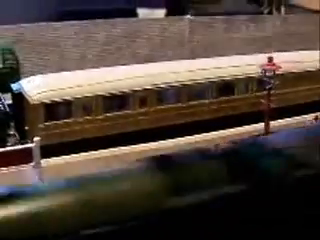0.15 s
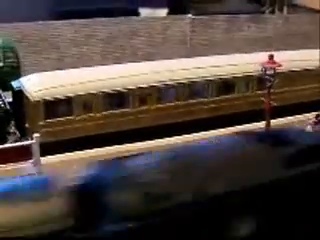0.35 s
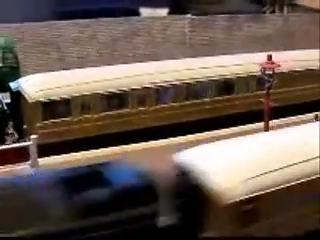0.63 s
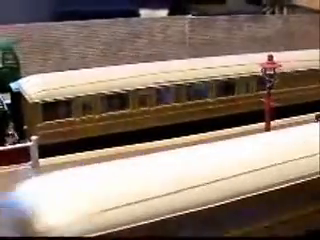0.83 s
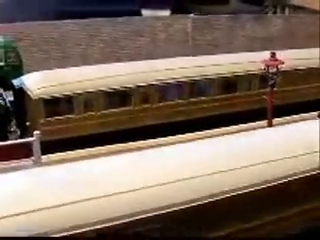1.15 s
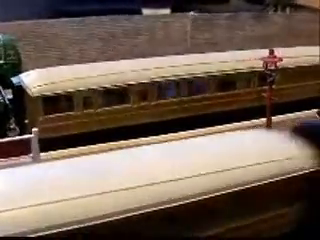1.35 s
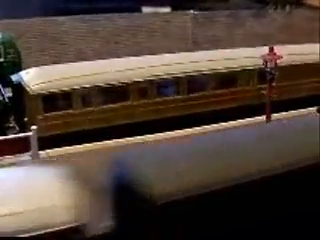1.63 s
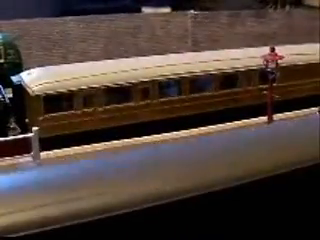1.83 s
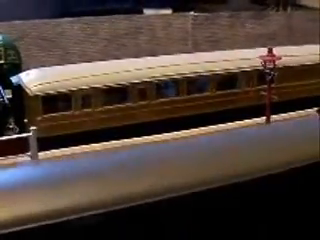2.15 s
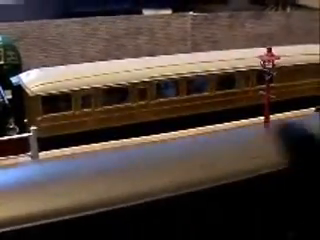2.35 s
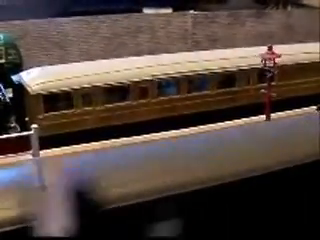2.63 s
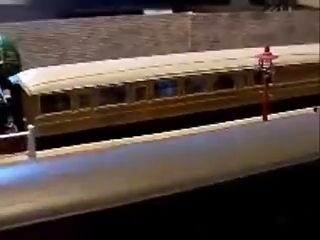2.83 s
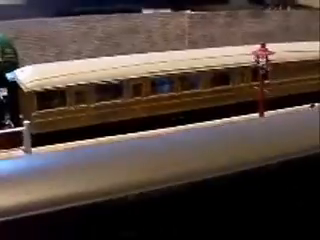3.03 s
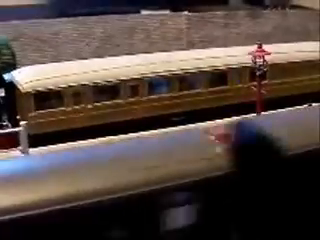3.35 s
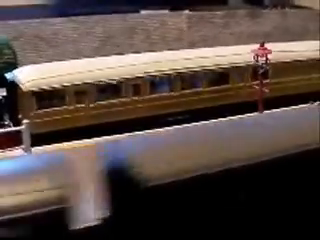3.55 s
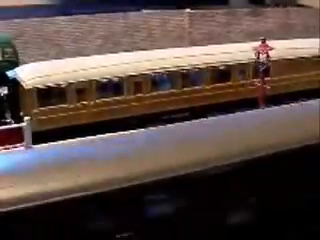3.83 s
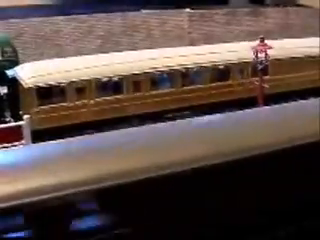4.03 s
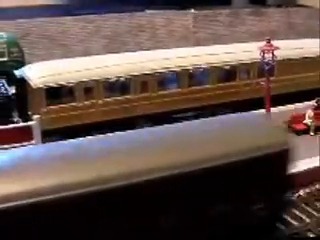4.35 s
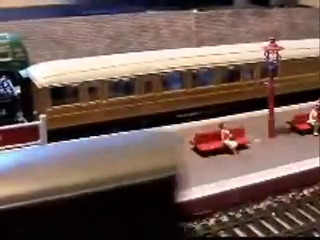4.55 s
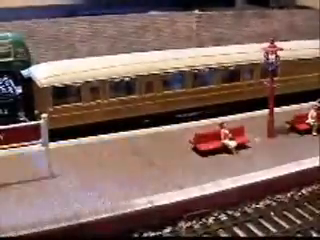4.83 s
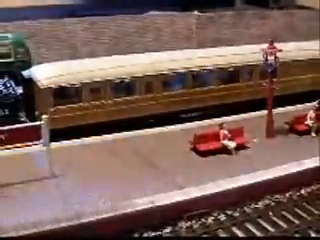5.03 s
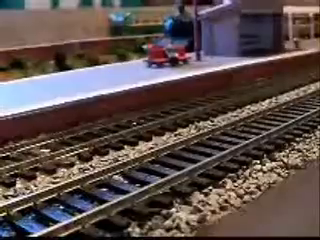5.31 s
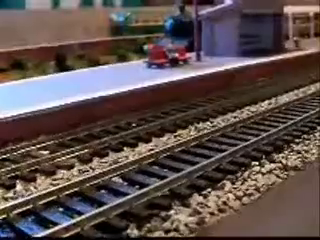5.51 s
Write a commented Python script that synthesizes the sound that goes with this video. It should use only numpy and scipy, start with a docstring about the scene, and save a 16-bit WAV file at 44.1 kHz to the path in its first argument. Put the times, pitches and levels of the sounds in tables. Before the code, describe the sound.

An electric model train is already rolling past close to the microphone at the start, nearly central. Its small metal wheels make a continuous, gritty roar with a hiss on top. Sharp little double clicks come unevenly as the axles cross a rail joint, thickest between about 0.4 and 0.9 seconds, then several a second. Beneath them the wooden baseboard gives a wavering hollow boom and soft low thuds, clearest near the start and around 2.5 seconds. A faint, thin, high motor whine comes in spurts, weakens after 1.5 seconds and is gone by 3 seconds. The roar holds steady until about 4 seconds, then drops as the train draws away and the clicks grow sparser. At about 5.2 seconds the sound switches to another spot on the layout, where the rolling is louder again and slightly brighter, with a few more clicks until the end at about 5.7 seconds.

```python
"""A roar of small metal wheels on rails, close to the microphone: an electric model train is rolling past.
Its axles click over a rail joint, the wooden baseboard booms and thuds beneath them, and the motor
at the front whines faintly. The train draws away; for the last half second it is heard from
another spot on the layout."""
import sys
import numpy as np
from scipy import signal
from scipy.fft import rfft, irfft, next_fast_len
from scipy.io import wavfile

SR = 44100
rng = np.random.default_rng(int(sys.argv[2]) if len(sys.argv) > 2 else 0)


def transcribe(u):
    """Save the signal u as a 16-bit wav file named by the first command-line argument.

    u: samples, shape (n,) or (channels, n), limited to [-1, 1]; the rate is SR.
    q: integer samples, one column per channel.
    """
    v = np.clip(np.atleast_2d(u).T, -1, 1)
    q = np.round(v * 32767).astype(np.int16)
    wavfile.write(sys.argv[1], SR, q)


N = 250488


def from_db(db):
    return 10 ** (np.asarray(db) / 20)


def unit_rms(x):
    return x / np.sqrt(np.mean(x ** 2) + 1e-20)


def in_time(rows):
    """One curve for each column after time_s, one value a sample."""
    times, *columns = np.transpose(rows)
    return [np.interp(np.arange(N) / SR, times, column) for column in columns]


def at_hz(points, hz):
    """A spectrum read on a log-frequency axis."""
    points_hz, levels_db = np.transpose(points)
    return np.interp(np.log(hz), np.log(points_hz), levels_db)


def drift(per_s):
    """A slow random wander of RMS 1, changing about per_s times a second."""
    hop, settle = 40, 2000
    pole = np.exp(-2 * np.pi * hop * per_s / SR)
    noise = rng.standard_normal(N // hop + settle + 2)
    slow = signal.lfilter([1], [1, -2 * pole, pole * pole], noise)[settle:]
    return np.interp(np.arange(N) / hop, np.arange(len(slow)), unit_rms(slow))


def ring(x, hz, t60_s):
    """A resonance that passes no deep bass; a unit click sets it ringing at about height 1."""
    radius, angle = from_db(-60 / (t60_s * SR)), 2 * np.pi * hz / SR
    return signal.lfilter([.5, 0, -.5], [1, -2 * radius * np.cos(angle), radius * radius], x + 1e-18)


def soft_ring(x, hz, t60_s):
    """Two resonances in series, so the ringing swells before it dies."""
    return ring(ring(x, hz, t60_s / 2), hz, t60_s)


def rail_grit(per_s, spread_db):
    """Roughness of wheel and rail: dense tiny bumps of uneven size."""
    sizes = from_db(spread_db * np.minimum(rng.exponential(1, N), 3)) * rng.choice([-1, 1], N)
    return unit_rms(sizes * (rng.random(N) < per_s / SR))


# The motor, fading as it leaves the microphone: time_s, lower_tone_db, upper_tone_db
WHINE_LEVELS = [(0, -47, -34.5), (.15, -40, -37), (.5, -40, -43), (.65, -43, -47.5), (.95, -40.5, -41),
                (1.1, -32, -45), (1.17, -47, -48.5), (1.4, -47, -40.5), (1.6, -57, -61), (1.9, -54, -56),
                (2.2, -62, -65), (2.8, -57, -61), (3, -70, -88)]


def motor_whine(pitches_hz=(4878, 7405), width_hz=24, rough_db=-1, spurt_db=2.5):
    """The motor's two thin tones swell in spurts, each roughened by a narrow band of noise."""
    out, t60_s = 0, np.log(1000) / (np.pi * width_hz)
    for level_db, hz in zip(in_time(WHINE_LEVELS), pitches_hz):
        rough = unit_rms(soft_ring(rng.standard_normal(N), hz, t60_s))
        tone = np.sqrt(2) * np.sin(2 * np.pi * hz * np.arange(N) / SR) + from_db(rough_db) * rough
        spurts = from_db(spurt_db * drift(per_s=6))
        out = out + from_db(level_db) * unit_rms(spurts * tone)
    return out


# Thuds in the wood under the track: start_s, peak_db, pitch_hz
BOARD_THUDS = [(.088, -43.5, 125), (.428, -54, 150), (.6, -63, 90), (0.656, -48, 150), (.755, -52.5, 115),
               (1.099, -56, 120), (1.2, -55, 120), (1.38, -59, 140), (1.52, -59, 140), (1.68, -56, 145),
               (1.749, -53, 149), (1.885, -60, 75), (2.14, -59, 135), (2.363, -49, 125), (2.466, -45, 130),
               (2.558, -53, 90), (2.672, -47, 105), (2.745, -54, 110), (3.154, -53.5, 110),
               (3.475, -56, 100), (3.612, -55, 90), (3.96, -60, 70), (4.608, -60, 100), (4.76, -52, 110),
               (5.394, -53, 100), (5.621, -55, 130)]


def board_thuds(t60_cycles=9):
    """The baseboard thuds under the heavier axles, swelling softly and dying within a few cycles."""
    out, click = np.zeros(N + SR), signal.unit_impulse(SR // 4)
    for start_s, peak_db, hz in BOARD_THUDS:
        thud = soft_ring(click, hz, t60_cycles / hz)
        start = round(start_s * SR)
        out[start:start + len(thud)] += from_db(peak_db) * thud / np.abs(thud).max()
    return out[:N]


# The baseboard's boom, swelling and sinking as the wheels move over it: time_s, level_db
BOOM_LEVELS = [(0, -36), (.35, -56), (.45, -40), (.54, -29.5), (.72, -41.5), (.85, -35.5), (1.1, -44.5),
               (1.25, -31), (1.4, -61), (1.6, -37), (1.9, -35), (2.15, -38), (2.4, -40), (2.95, -37),
               (3.2, -35), (3.5, -43), (3.77, -32), (3.9, -52.5), (4.5, -37), (4.9, -41), (5.2, -41),
               (5.68, -40)]


def board_boom(pitch_hz=915, width_hz=80):
    """Rail grit drives one resonance of the baseboard."""
    t60_s = np.log(1000) / (np.pi * width_hz)
    boom = soft_ring(rail_grit(per_s=4000, spread_db=0.88), pitch_hz, t60_s)
    return from_db(in_time(BOOM_LEVELS)[0]) * unit_rms(boom)


# How near the train is to the microphone, as a gain: time_s, nearness_db
NEARNESS = [(0, 0), (.35, 2), (.75, 0.5), (1.1, 0), (1.7, 0.5), (2.15, -0.5), (2.6, 0.5), (3.2, 0),
            (3.6, -2), (3.92, -1), (4.25, -5.5), (4.6, -5.5), (5.05, -8.5), (5.22, -8.5)]
# Rise and fall of the rumble at the first spot: time_s, gain_db
RUMBLE_SWELL = [(0, 3.5), (.45, -1), (.75, -5), (1.1, -5.5), (1.6, -2.5), (2.2, -3.5), (2.5, 3), (3.4, 1),
                (3.7, -3), (5.2, 4.5)]
# Rumble, roar, rush, hiss and top hiss at the microphone, a row each:
# near_db, nearness_share, opening_db (lift or dip at the start), second_spot_db
BAND_LEVELS = [(-51.5, 0.55, 5.5, -49), (-30, 0.6, -1.8, -30), (-27.5, 0.92, 1, -29),
               (-30.5, 1.07, -3, -31.5), (-71.5, 1.94, 17, -49.5)]


def levels_at_microphone(opening_s=1.57, second_spot_s=5.222, switch_s=0.018):
    """Band levels in dB follow the train's distance as the opening lift or dip fades, then change spot."""
    t = np.arange(N) / SR
    near_db, share, opening_db, second_spot_db = np.transpose(BAND_LEVELS)[:, :, None]
    opening_fade = np.clip(1 - t / opening_s, 0, 1)
    passing_db = near_db + share * in_time(NEARNESS)[0] + opening_db * opening_fade
    passing_db[0] += in_time(RUMBLE_SWELL)[0]
    moved = np.clip((t - second_spot_s) / switch_s, 0, 1)
    return (1 - moved) * passing_db + moved * second_spot_db


# Colour of the rolling noise before each band is levelled, with a separate thin hiss near 8.5 kHz:
# frequency_hz, density_db
ROLL_SPECTRUM = [(60, -63.5), (100, -56), (160, -22), (230, -16.5), (330, -6), (550, 0.5), (780, 0),
                 (1100, -2), (2950, -7.5), (3550, -10.5), (5970, -11.5), (7060, -17), (7600, -48),
                 (8000, -34.5), (8550, -16)]
# Baseboard resonances that colour the roar: pitch_hz, width_hz, lift_db
BOARD_MODES = [(622, 50, 4), (915, 70, 2.5), (1452, 70, 1.5)]
# Faint, flickering left-right difference: frequency_hz, side_against_mid_db
SIDE_SPECTRUM = [(100, -11), (300, -49.5), (900, -20.5), (1600, -32), (2000, -18.5), (2900, -10),
                 (3900, -9), (4300, -45), (8000, -28)]
# Edges of rumble, roar, rush, hiss and top hiss: low_hz, high_hz
BAND_EDGES = [(100, 300), (300, 1500), (1500, 4000), (4000, 7200), (7600, 8600)]


def rolling_roar(levels_db, grit_db=-6, treble_flicker_db=1, flicker_db=1.17, lumps_db=3.5,
                 side_flicker_db=6):
    """Wheels on rough rails: noise and grit in flickering half-octave bands, the rumble in lumps."""
    size = next_fast_len(N)
    hz = np.maximum(np.arange(size // 2 + 1) * SR / size, 1)
    contact = rng.standard_normal(N) + from_db(grit_db) * rail_grit(per_s=2500, spread_db=2.4)
    roll_db = at_hz(ROLL_SPECTRUM, hz)
    board_db = sum(db / (1 + (2 * (hz - pitch) / width) ** 2) for pitch, width, db in BOARD_MODES)
    mid = rfft(contact, size) * from_db(roll_db + board_db)
    side = rfft(rng.standard_normal(N), size) * from_db(roll_db + at_hz(SIDE_SPECTRUM, hz))
    power = [2 * np.sum(np.abs(mid[(hz > low) & (hz < high)]) ** 2) / size ** 2
             for low, high in BAND_EDGES]
    band_gains_db = levels_db - 10 * np.log10(power)[:, None]
    log_middles = np.log(BAND_EDGES).mean(axis=1)
    out, treble_drift = 0, drift(per_s=34.4)
    for centre_hz in 62.5 * 2 ** np.arange(0, 8, .5):
        mask = np.cos(np.pi * np.clip(np.log2(hz / centre_hz), -.5, .5)) ** 2
        # how much this half octave belongs to each of the five broad bands
        shares = [np.interp(np.log(centre_hz), log_middles, band) for band in np.eye(len(BAND_EDGES))]
        rumble, _, rush, hiss, _ = shares
        together_db = treble_flicker_db * (rush + hiss) * treble_drift
        own_db = (flicker_db + lumps_db * rumble) * drift(per_s=9.4)
        gain = from_db(shares @ band_gains_db + together_db + own_db)
        side_band = from_db(side_flicker_db * drift(per_s=6.9)) * irfft(side * mask, size)[:N]
        out = out + gain * (irfft(mid * mask, size)[:N] + side_band * [[1], [-1]])
    return out


def light_knocks(count=60, per_s=3.9, base_db=-31):
    """Light knocks at random moments, fainter with distance, as rows like those of AXLE_CLICKS."""
    draws = rng.random((count, 2))
    times = 0.0082 + np.cumsum(-np.log(draws[:, 0]) / per_s)
    levels_db = base_db + np.interp(times, *np.transpose(NEARNESS)) + 2.4 * draws[:, 1]
    rings = (1898, 2813.5, 0.5, 9.5, -5.5)   # as wheel_knock takes them
    return [(time_s, db, db - 8, *rings) for time_s, db in zip(times, levels_db) if time_s < N / SR]


# Modes of a metal wheel: pitch_hz, relative_db, t60_s
WHEEL_MODES = [(549, -13, 0.012), (938, -9, 0.01), (1400, -4, 0.004), (1900, -3, 0.003), (2500, -2, 0.003),
               (3400, -2, 0.004), (4150, -5, 0.006), (5100, -11.5, 0.003), (6100, -13, 0.003)]


def wheel_knock(length, low_hz, high_hz, low_db, t60_ms, modes_db):
    """One touch of wheel on rail rings two pitches of its axle and the modes of the wheel."""
    click = signal.unit_impulse(length)
    knock = ring(click, high_hz, t60_ms / 1000) - from_db(low_db) * ring(click, low_hz, t60_ms / 1000)
    strengths = from_db(rng.normal(0, 2, len(WHEEL_MODES))) * (-1) ** np.arange(len(WHEEL_MODES))
    for strength, (hz, db, t60_s) in zip(strengths, WHEEL_MODES):
        knock += strength * from_db(db + modes_db) * ring(click, hz, t60_s)
    return knock


# Axles crossing the rail joint, as they reach the microphone: time_s, first_wheel_db, second_wheel_db,
# low_ring_hz, high_ring_hz, low_against_high_db, ring_t60_ms, wheel_modes_db
AXLE_CLICKS = [(0.089, -19, -8.5, 1410, 3510, -23, 8.3, -1.5), (0.1235, -13, -27, 1960, 3260, 4, 6.2, -3),
               (0.396, -11, -28, 2290, 2850, -4, 6.2, -1), (0.4292, -13, -5, 1210, 2280, 5, 3.1, 3.5),
               (0.442, -14, -17, 1500, 2280, -2, 6, 1), (0.521, -33, -16, 860, 2010, 15, 35, -4),
               (0.5583, -14, -15, 2020, 2450, 6, 9.1, 5), (0.5888, -5.5, -25, 1010, 2960, -6, 6.9, -4),
               (0.6055, -12, -23, 1920, 3020, 6, 8, 0), (0.6634, -6.5, -5.5, 1540, 3840, -1, 5.8, -24),
               (0.706, -7.5, -19, 2300, 2640, 3, 3.7, -1), (0.7435, -5.5, -27, 1460, 3140, -0.5, 24, -2),
               (0.8185, -15, -5.5, 970, 2170, -13, 8.7, -0.5), (0.8295, -7.5, -16, 1860, 2800, 3, 6, 12),
               (0.8666, -15, -13.5, 2000, 2690, -1, 5.5, -2),
               (1.0086, -10.5, -7.5, 1090, 2994, -10, 11, 4.5),
               (1.1351, -23, -7, 2310, 2800, -7.5, 4.8, 10), (1.3937, -9, -15, 1530, 2850, -7, 4.7, -1),
               (1.5148, -5.5, -16, 2170, 2980, -33, 3.1, -12),
               (1.6028, -6.5, -8.5, 1850, 2980, -8, 3.2, -0.5), (1.6996, -13, -12, 2085, 2830, -6, 2.7, 5),
               (1.723, -21, -5, 2200, 2620, -6, 4.3, -1), (1.847, -16, -28, 930, 2750, 4, 4, 3),
               (1.9048, -6, -12, 1310, 2980, -8, 4.8, 1), (2.0234, -16, -8.5, 1150, 3610, -11, 6.2, 1.5),
               (2.3625, -8, -15, 1320, 2770, 7, 4.1, 7), (2.543, -16, -12.5, 900, 2590, -6.5, 9.3, -1),
               (2.5637, -9.5, -10, 2000, 3260, -7, 6.6, -5.5), (2.659, -12, -20, 904, 2360, -2, 5.4, -2),
               (2.6799, -15, -5, 2150, 2610, 2, 5.5, 1), (2.8564, -15, -5, 1400, 3000, -0.5, 5.6, -3),
               (2.9705, -7.5, -19, 900, 2580, -4, 8.5, 9), (3.257, -17, -23, 1650, 2650, 12, 9.6, -13),
               (3.3285, -15, -15, 1200, 2900, 11, 9.8, -13), (3.418, -9.5, -10.5, 980, 3040, -8, 6.8, 4),
               (3.508, -6, -8, 1800, 2360, -3, 4.3, 4), (3.6326, -11, -8.5, 1900, 3740, -6, 10.5, -0.5),
               (3.8293, -24, -5.5, 1500, 2980, 0, 10, 2), (3.961, -8.5, -17, 1450, 2780, -17, 3.5, -3),
               (4.242, -29, -18, 1960, 2700, 2, 9, -9), (4.6141, -5, -7, 1470, 2370, 1, 5.4, 0.5),
               (4.766, -8, -19, 2700, 3460, -4, 7.1, -6.5), (4.7863, -19, -25, 1770, 2750, 3, 5.5, 4.5),
               (5.285, -29, -20, 1860, 4580, -8.5, 6.1, -7), (5.385, -12.5, -11, 1440, 4500, 4, 13, -16),
               (5.4285, -21, -20, 1900, 2700, -2, 6.4, -3), (5.473, -23, -17, 930, 4430, -12, 5.5, -4)]


def joint_clicks(lag_ms=1.7, lag_spread_ms=0.15, rattle_db=-14, rattle_ms=2.8, touches_per_s=2500):
    """Both wheels of an axle drop across the gap, a moment apart, amid a short rattle."""
    out, length, first = np.zeros(N), 2600, 150   # length and first touch in samples
    # light, rounded flanges: no sharp edge, no thump
    soften = np.vstack([signal.butter(8, 6300, fs=SR, output="sos"),
                        signal.butter(2, 200, "high", fs=SR, output="sos")])
    for time_s, first_db, second_db, *rings in AXLE_CLICKS + light_knocks():
        second = first + round((lag_ms + lag_spread_ms * rng.uniform(-0.66, 1)) * SR / 1000)
        rattle = rng.standard_normal(length) * (rng.random(length) < touches_per_s / SR)
        fade = np.exp(-np.abs(np.arange(length) - second) / (rattle_ms * SR / 1000))
        touches = from_db(max(first_db, second_db) + rattle_db) * rattle * fade
        touches[[first, second]] = from_db([first_db, second_db])
        knock = signal.sosfilt(soften, wheel_knock(length, *rings))
        clatter = signal.fftconvolve(touches, knock / np.abs(knock).max())[:length]
        start = round(time_s * SR) - first - np.abs(knock).argmax()   # first wheel peaks at time_s
        out[start:start + length] += clatter[:N - start]
    return out


def scene():
    """The train from beside the track, nearly central."""
    roar = rolling_roar(levels_at_microphone())
    whine = motor_whine()
    clicks = joint_clicks()
    return roar + board_boom() + board_thuds() + clicks + whine


def record(dry):
    """The small microphone loses the deep bass; the top is cut steeply."""
    thin = signal.sosfilt(signal.butter(2, 50, "high", fs=SR, output="sos"), dry)
    return signal.sosfilt(signal.ellip(12, .5, 70, 8650, fs=SR, output="sos"), thin)


dry = scene()
out = record(dry)
transcribe(out)
```